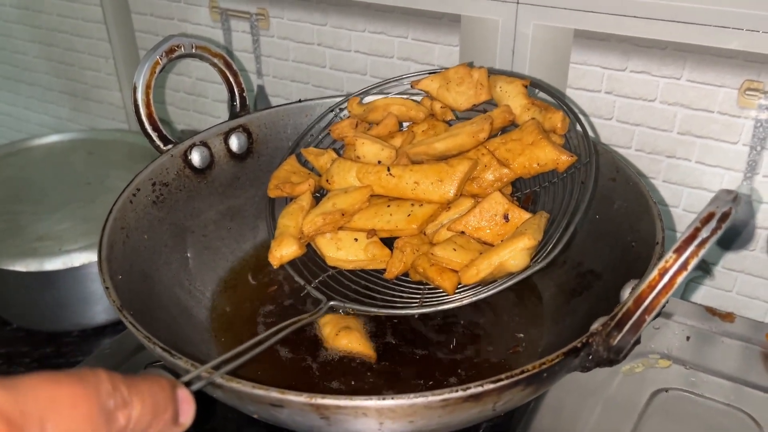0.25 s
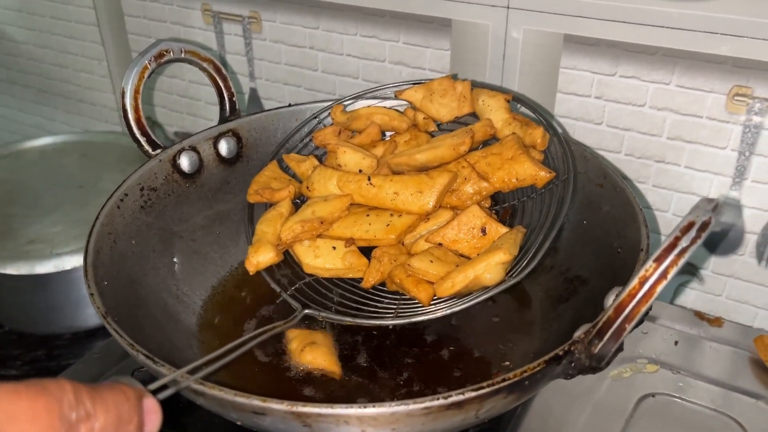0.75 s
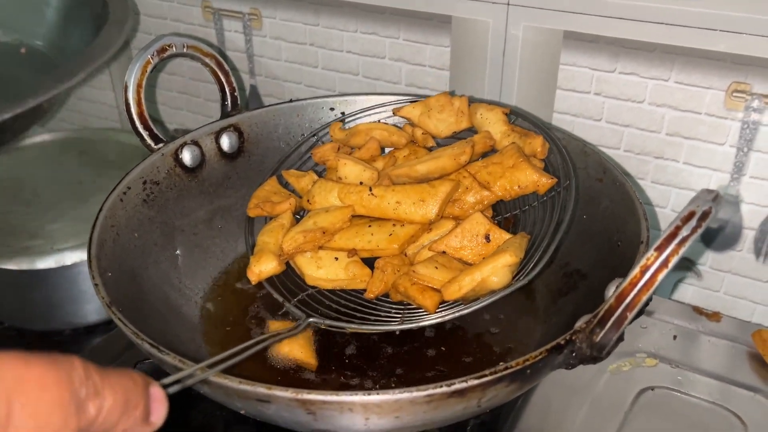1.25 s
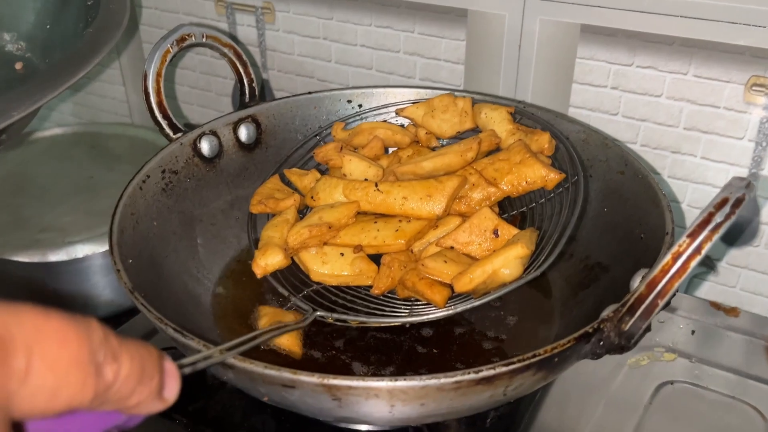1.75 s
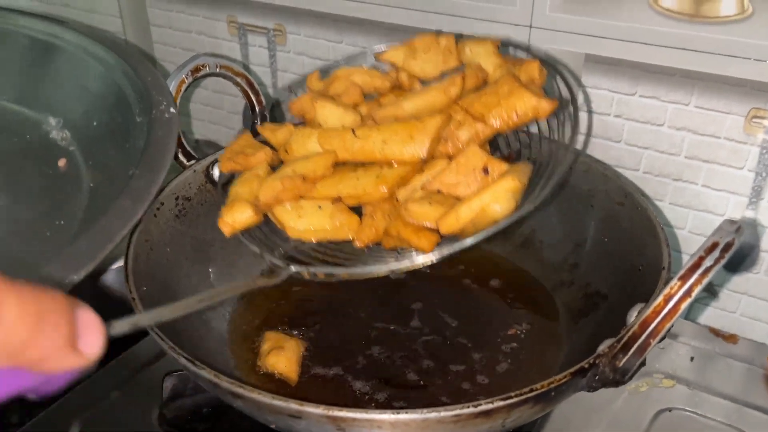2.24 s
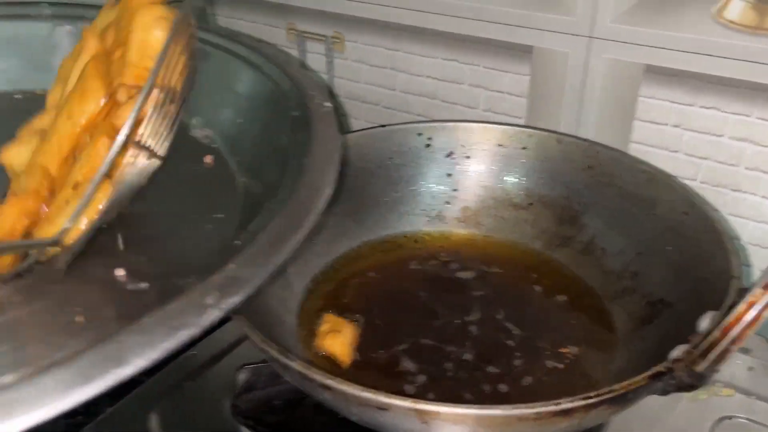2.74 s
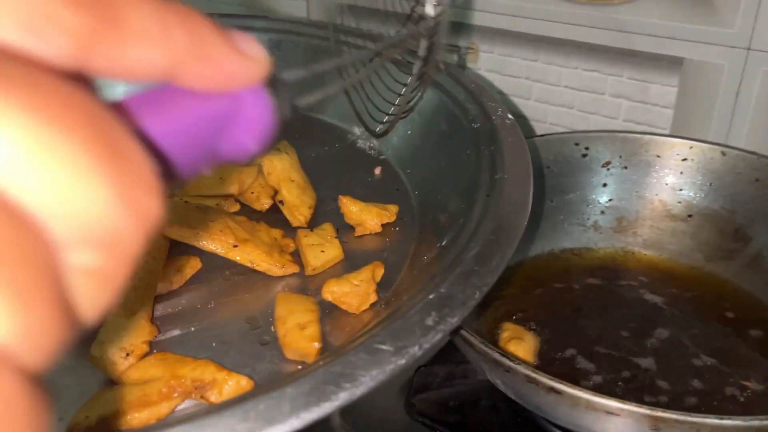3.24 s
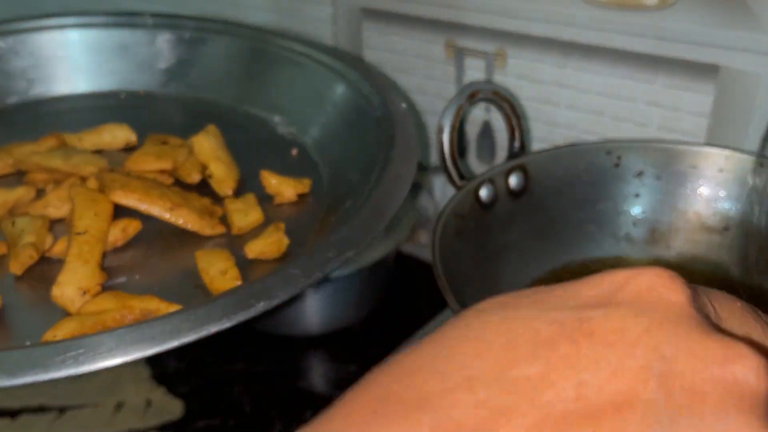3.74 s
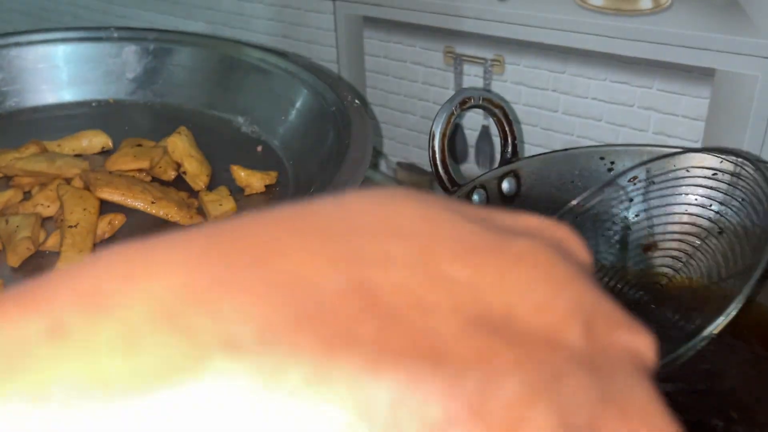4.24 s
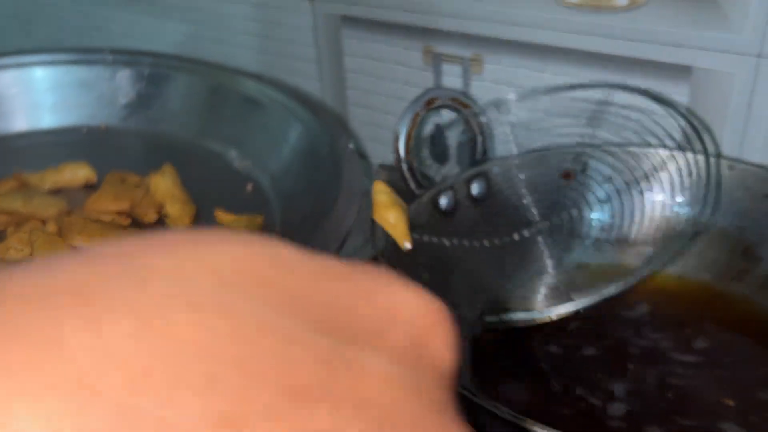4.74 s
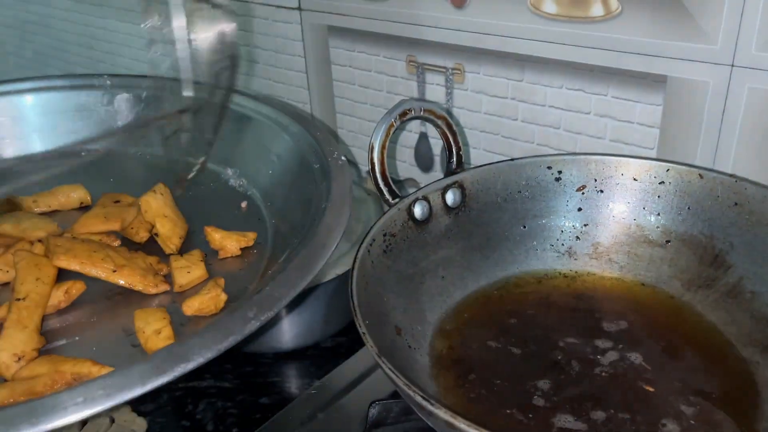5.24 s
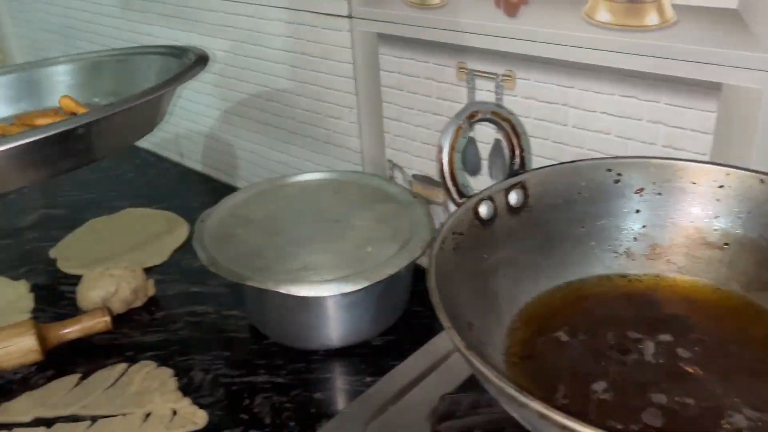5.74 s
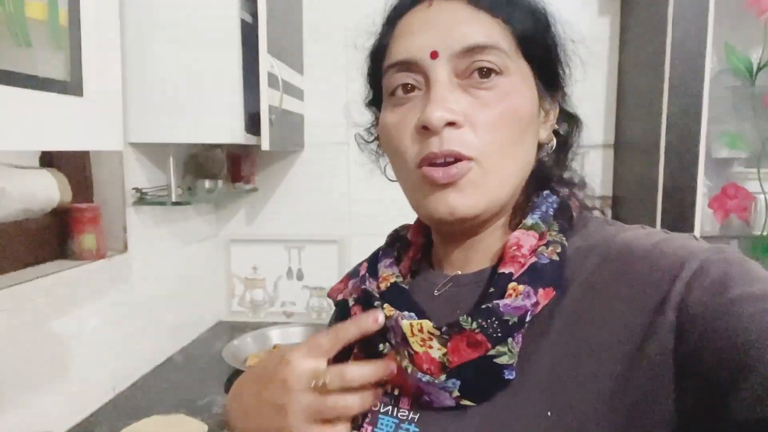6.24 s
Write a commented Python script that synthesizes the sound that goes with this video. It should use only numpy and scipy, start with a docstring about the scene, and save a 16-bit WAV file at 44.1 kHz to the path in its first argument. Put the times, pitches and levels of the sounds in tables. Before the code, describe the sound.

A metal skimmer clangs on a pan, then tips fried snacks clattering onto a steel plate while a gas flame softly hisses and pops.

```python
"""Frying in a home kitchen, heard on a phone. A gas flame pops softly over hiss and rumble; oil spits.
A wire skimmer knocks the iron pan, then a steel plate, and trembles. Near 3 s fried snacks tumble out,
thudding and ringing the plate's modes. A thin whistle glides far off while the wires scrape the pan;
lighter knocks, clinks and sliding snacks follow. Just after 6 s comes a short silent cut, and then
the phone stands elsewhere in the quiet room."""
import sys
import numpy as np
from scipy import signal
from scipy.fft import rfft, irfft, next_fast_len
from scipy.io import wavfile
from scipy.ndimage import uniform_filter1d, map_coordinates

SR = 44100
rng = np.random.default_rng(int(sys.argv[2]) if len(sys.argv) > 2 else 0)


def persist_wave(psi):
    """Save psi, clipped to +-1, as 16-bit WAV."""
    counts = np.round(np.clip(psi, -1, 1) * 32767).astype(np.int16)
    wavfile.write(sys.argv[1], SR, np.atleast_2d(counts).T)


N = 286014
TIME = np.arange(N) / SR


def amp(db):
    return 10 ** (np.asarray(db) / 20)


def unit(x):
    return x / np.sqrt(np.mean(x ** 2) + 1e-20)


def along(points, hz):
    """A table's columns after the first, read on a log frequency axis."""
    freqs, *columns = np.transpose(points)
    return np.squeeze([np.interp(np.log(hz + 1), np.log(freqs + 1), c) for c in columns])


def automation(rows):
    """One curve for each column after the time."""
    times, *columns = np.transpose(rows)
    return [np.interp(TIME, times, c) for c in columns]


def wobble(rate):
    """A smooth random curve, rate knots a second."""
    return map_coordinates(rng.standard_normal(int(N * rate / SR) + 4), [TIME * rate])


def swell(start, rise, db, fall_db_per_s):
    """Envelope of a movement: linear attack, exponential decay."""
    t = TIME - start
    return np.clip(t / rise, 0, 1) * amp(db - fall_db_per_s * np.maximum(t - rise, 0))


def filtered(x, response):
    """x through a complex frequency response."""
    size = next_fast_len(N + SR // 2)
    return irfft(rfft(x, size) * response(np.fft.rfftfreq(size, 1 / SR)), size)[..., :N]


def eq(points):
    return lambda hz: amp(along(points, hz))


def body(modes, width_hz):
    """Response of a struck object: resonances of alternating polarity."""
    def response(hz):
        f = hz[::16]
        damping = 1j * f * width_hz
        peaks = [(-1) ** k * amp(db) * damping / (centre ** 2 - f ** 2 + damping)
                 for k, (centre, db) in enumerate(modes)]
        return np.interp(hz, f, sum(peaks))
    return response


def noise(response, patchy_db):
    """Two unrelated noises with shared patches of random gain."""
    spectra = signal.stft(rng.standard_normal((2, N)), nperseg=512)[2]
    patches = uniform_filter1d(rng.standard_normal(spectra.shape[1:]), 6, axis=0)
    patches = unit(uniform_filter1d(patches, 12, axis=1))
    pair = signal.istft(spectra * amp(patchy_db * patches), nperseg=512)[1][:, :N]
    return unit(filtered(pair, response))


def contacts(rate, spread_db):
    """Two unrelated trains of tiny blows, rate a second."""
    hits = rng.random((2, N)) < rate / SR
    return unit(hits * rng.standard_normal((2, N)) * amp(spread_db * rng.standard_normal(N)))


def add(track, start, sound):
    """Mix a sound into a track at start seconds."""
    part = track[..., round(start * SR):][..., :sound.shape[-1]]
    part += sound[..., :part.shape[-1]]


# Stereo image at the stove and away from it: (frequency [Hz], likeness [0-1], left lead [rad])
STOVE_IMAGE = [(100, 1, 0), (300, 0.82, 0.5), (686, 0.39, 0.6), (1540, 0.17, 0.56), (3040, 0.66, -1.5),
               (5700, 0, 0.9), (7875, 1, 3.5), (8710, 1, 3), (10430, 0.4, 5.5), (11300, .99, 7),
               (13300, 0.8, 6.5), (14800, 0.99, 9.5)]
AWAY_IMAGE = [(104, 0.82, 1), (1020, 0.47, -2), (6900, 0.2, -1.5), (12950, 0.56, 9)]
# Balance at both spots: (frequency [Hz], left over right [dB])
STOVE_BALANCE = [(100, .5), (300, 0), (5000, 3), (7500, 0.5)]
AWAY_BALANCE = [(3000, -0.8)]
def phone_mics(pair, image, balance):
    """Mid/side to left/right: mid reaches both ports alike, with a lag; side differs. Sub-bass is lost."""
    def mix(hz):
        likeness, lead = along(image, hz)
        width = np.arccos(np.clip(likeness, 0, 1)) / 2
        mid, side = np.cos(width), np.sin(width)
        leftward = amp(along(balance, hz) / 2) * np.exp(.5j * lead)
        low_cut = (1j * hz / (1j * hz + 30)) ** 2
        return low_cut * np.array([[mid, side] * leftward, [mid, -side] / leftward])
    return filtered(pair, mix).sum(axis=1)


# Reverb decay: (frequency [Hz], T60 [s])
KITCHEN_DECAY = [(200, 0.71), (2000, 0.55), (12000, 0.28)]
def kitchen_reverb(x):
    """The room answers with a diffuse tail whose highs die first."""
    hz, t, spectra = signal.stft(rng.standard_normal((2, SR // 2)), SR, nperseg=256)
    decay = amp(-60 * t / along(KITCHEN_DECAY, hz)[:, None])
    tail = signal.istft(spectra * decay, SR, nperseg=256)[1]
    predelayed = np.pad(x, ((0, 0), (300, 0)))
    return signal.fftconvolve(predelayed, tail / np.linalg.norm(tail[0]), axes=1)[:, :N]


# Room tone spectrum: (frequency [Hz], level [dB])
ROOM_EQ = [(80, -2), (300, -5), (450, 10), (600, -1.5), (6000, -8.5), (11000, -14), (15500, -26)]
def room_tone():
    """A faint, steady bed of noise away from the stove."""
    return amp(-49.5) * noise(eq(ROOM_EQ), patchy_db=-0.1)


# Burner fader moves: (time [s], rumble level [dB], hiss level [dB])
BURNER_LEVELS = [(0, -49, -44.5), (.15, -53, -50), (3.5, -49.5, -51.5), (6.07, -52.5, -56)]
# Flame rumble and gas hiss spectra: (frequency [Hz], level [dB])
RUMBLE_EQ = [(25, -15), (70, 3.5), (140, 2.5), (200, -13), (275, -5), (400, -30.5), (800, -87)]
HISS_EQ = [(150, -21.5), (300, 2.5), (750, 6.5), (1500, 0.5), (3000, 1), (6000, -1.5), (11000, -1.5),
           (14500, -5), (15600, -24.5)]
def burner():
    """Burning gas rumbles unevenly and hisses, with a low, wavering hum."""
    rumble_db, hiss_db = automation(BURNER_LEVELS)
    rumble = amp(rumble_db + 3.7 * wobble(8.2)) * noise(eq(RUMBLE_EQ), patchy_db=0)
    hum = amp(-54 + 1.9 * wobble(15)) * np.sin(2 * np.pi * 149 * TIME)
    hiss = amp(hiss_db) * noise(eq(HISS_EQ), patchy_db=1.1)
    return rumble + hiss + hum * [[1], [0]]  # hum in the mid only


# Flame pop cues: (time [s], level [dB])
FLAME_POPS = [(0.054, -31.5), (.224, -30), (.424, -30.5), (0.46, -32), (0.682, -32), (0.747, -32.5),
              (.927, -29.5), (1.097, -30.5), (1.177, -30), (1.444, -28), (1.601, -30), (1.754, -30),
              (1.835, -29.5), (2.066, -29), (2.291, -30.5), (2.381, -28.5), (2.524, -29), (2.692, -32),
              (3.21, -28), (3.43, -31.5), (3.532, -31.5), (3.658, -32.5), (3.835, -33.5), (3.889, -31),
              (4.116, -31), (4.34, -31.5), (4.419, -32), (4.567, -33.5), (4.739, -31), (4.795, -32),
              (5.016, -34.5), (5.052, -31), (5.252, -28.5), (5.351, -31.5), (5.481, -31), (5.674, -33.5),
              (5.7, -31.5), (5.899, -28)]
def flame_pops():
    """Each pop is one pressure swing whose pitch drops; a hollow nearby answers."""
    sound, t = np.zeros(N), np.arange(SR // 20) / SR
    hollow = amp(-9.5 - 60 * t / 0.053) * np.sin(2 * np.pi * 275 * t)
    for start, db in FLAME_POPS:
        age = t / amp(0.55 * rng.standard_normal())  # each pop is stretched a little differently
        cycles = (age / .0048) ** .55 - .2
        envelope = (age / .0062 * np.exp(1 - age / .0062)) ** 1.4
        add(sound, start, amp(db) * (hollow - np.sin(2 * np.pi * cycles) * envelope))
    return sound * [[1], [0]]


# Whistle glide: (time [s], pitch [Hz], level [dB])
WHISTLE_GLIDE = [(3.5, 2554, -65), (3.95, 2190, -64.5), (4.2, 2080, -60), (4.55, 2036, -66.5),
                 (4.95, 2036, -58.5), (5.7, 2130, -69)]
def whistle(fade_s=0.079):
    """A thin, slightly unsteady tone that sinks and climbs again."""
    hz, db = automation(WHISTLE_GLIDE)
    phase = 2 * np.pi * np.cumsum(hz) / SR + 0.46 * wobble(30)
    fade_in = np.clip((TIME - WHISTLE_GLIDE[0][0]) / fade_s, 0, 1)
    fade_out = np.clip((WHISTLE_GLIDE[-1][0] - TIME) / fade_s, 0, 1)
    return fade_in * fade_out * amp(db) * np.array([np.sin(phase), np.cos(phase)])


# Hot oil cues: (time [s], level [dB], pitch [Hz])
OIL_SPITS = [(1.017, -36, 4260), (3.296, -27.5, 4074), (4.065, -37, 1580), (4.854, -33, 6460),
             (4.958, -33.5, 5930)]
def oil_spits():
    """Droplets burst with a click and a ping of a few cycles."""
    sound, t = np.zeros((2, N)), np.arange(SR // 50) / SR
    for start, db, hz in OIL_SPITS:
        ping = np.sin(2 * np.pi * hz * t) * amp(-60 * t * hz / 18)
        click = 0.93 * rng.standard_normal((2, len(t))) * amp(-60 * t / 0.0072)
        add(sound, start, amp(db) * (ping + click))
    return sound


# Small metal clinks: (time [s], level [dB], pitch [Hz])
METAL_CLINKS = [(5.72, -27.5, 4130), (5.89, -37, 3770), (5.947, -37.5, 4750)]
def clinks():
    """Metal rings briefly in two inharmonic partials."""
    sound, t = np.zeros((2, N)), np.arange(SR // 10) / SR
    for start, db, hz in METAL_CLINKS:
        ring = np.sin(2 * np.pi * hz * t) + .9 * np.sin(2 * np.pi * 1.32 * hz * t)
        add(sound, start, amp(db - 60 * t / 0.028) * ring * [[1], [.3]])
    return sound


# Skimmer wire modes and the spectrum of dry, crisp contact: (frequency [Hz], level [dB])
WIRE_MODES = [(750, -2), (1155, 4.5), (1250, 1), (1440, 1.5), (1780, -1.5), (2190, -4.5), (2600, -6),
              (3330, -2), (4220, -7.5), (5950, -1)]
CRISP_EQ = [(400, -5.5), (1500, 2.5), (3500, 7), (7000, -5), (10000, -17), (16000, -50)]
def skimmer_scrape(start_s=4.432, lift_off_s=4.67):
    """Fast slips of the wires on the pan ring the skimmer until it lifts off."""
    slips = contacts(rate=4700, spread_db=4)
    wires = body(WIRE_MODES, width_hz=70)
    rasp = unit(filtered(slips, lambda hz: wires(hz) + amp(along(CRISP_EQ, hz) - 16.5)))
    touching = np.clip((lift_off_s - TIME) / 0.018 + 1, 0, 1)
    return touching * swell(start_s, rise=0.061, db=-38, fall_db_per_s=100) * rasp


# Trembles of the lifted skimmer: (time [s], attack [s], level [dB], decay [dB/s])
TREMBLES = [(2.167, 0.0067, -41, 57), (2.329, 0.041, -46.5, 56.5)]
# The steel plate's low and bright modes, and an impact's crack: (frequency [Hz], level [dB])
PLATE_LOW_MODES = [(222, -2.5), (252, -3.5), (278, -3.5), (382, -8.5), (445, -10), (577, -3.5), (706, -5),
                   (752, -6), (807, -3), (835, -3.5), (1105, -9), (1369, -9), (1600, -17.5), (2000, -19.5),
                   (2210, -19.5)]
PLATE_BRIGHT_MODES = [(1785, -3), (3100, -6), (3610, 1), (3705, 4), (3850, -7.5)]
CRACK_EQ = [(150, 0.5), (1000, -3), (2700, -10), (4300, -2.5), (6200, -7.5), (11000, -12), (13000, -16),
            (16000, -27.5)]
def skimmer_tremble():
    """Loose wires and the plate keep buzzing after the skimmer leaves the rim."""
    def response(hz):
        wires = amp(-5.5) * body(WIRE_MODES, width_hz=16)(hz)
        rim = body(PLATE_BRIGHT_MODES, width_hz=33)(hz)
        plate = amp(4) * body(PLATE_LOW_MODES, width_hz=20)(hz)
        return wires + rim + plate + amp(along(CRACK_EQ, hz) - 9)
    chatter = contacts(rate=250, spread_db=3) * amp(4 * wobble(24))
    return sum(swell(*move) for move in TREMBLES) * unit(filtered(chatter, response))


# Snacks sliding and tumbling on the plate:
# (time [s], attack [s], level [dB], decay [dB/s], ring over thud [dB], crispness over thud [dB])
SNACK_MOVES = [(2.666, 0.013, -40.5, 63, 1, -5), (2.799, 0.13, -16.5, 96.5, 0, -8.5),
               (5.787, 0.0114, -33, 114, -8, -8), (5.87, 0.025, -37, 71, -8, -11.5),
               (6.035, 0.014, -42, 36, -1.5, -6.5)]
# Thud of landing dough: (frequency [Hz], level [dB])
THUD_EQ = [(60, -25), (130, -10.5), (230, -5), (330, -3.5), (700, -2), (1000, -8), (2200, -17), (4000, -40)]
def snack_tumble():
    """Many soft, lumpy blows thud and drive the plate; dry edges add the treble."""
    blows = contacts(rate=1400, spread_db=2) * amp(3 * wobble(45))
    thud = unit(filtered(blows, eq(THUD_EQ)))
    ring = unit(filtered(blows, body(PLATE_LOW_MODES, width_hz=22.3)))
    edges = contacts(rate=2500, spread_db=3) * amp(3.5 * wobble(40))
    crisp = unit(filtered(edges, eq(CRISP_EQ)))
    return sum(swell(*move) * (thud + amp(ring_db) * ring + amp(crisp_db) * crisp)
               for *move, ring_db, crisp_db in SNACK_MOVES)


# The biggest snacks hitting the plate: (time [s], level [dB])
SNACK_HITS = [(2.852, -24), (2.88, -30), (2.926, -13), (2.955, -20), (2.98, -21.5), (3.019, -20),
              (3.075, -27)]
def snack_landings():
    """Each big snack briefly rings its own mix of the plate's modes."""
    sound, t = np.zeros((2, N)), np.arange(SR // 6) / SR
    hz, mode_db = np.transpose(PLATE_LOW_MODES)[:, :, None]
    tilt_db = 4 * np.log2(hz / 1000)
    envelope = (1 - np.exp(-t / 0.0035)) * amp(-60 * t / 0.14)
    for start, db in SNACK_HITS:
        gains = amp(mode_db + tilt_db + rng.normal(0, 3, (2, len(hz), 1)))
        ring = (gains * np.sin(2 * np.pi * hz * t)).sum(axis=1)
        add(sound, start, amp(db) * envelope * ring)
    return sound


# Skimmer hits on the pan and on the plate; the sends are relative to the hit's level:
# (time [s], level [dB], low send [dB], wire send [dB], bright send [dB], pan only: boom level [dB])
PAN_HITS = [(1.3445, -14.5, 4, -1, 4, -25.5), (1.808, -51.5, 11, 3.5, -14, -51),
            (5.717, -23.5, 1, -24, -6.5, -27.5), (5.792, -32, -1, 3.5, -3, -37)]
PLATE_HITS = [(2.161, -24, -1.5, -22, 3), (2.235, -41.5, 4.5, -24, -6.5), (2.756, -7, -12.5, -11.5, -1),
              (5.127, -41.5, 18.5, -34, 4), (5.209, -44.5, 12, -17, -1), (5.26, -36, 4.5, -25, -12),
              (5.295, -39.5, 8, -15, -14)]
def pan_boom(hz=281, beat_hz=5.5, attack_s=0.015, t60_s=0.48):
    """Each knock on the pan wakes its deepest mode, a close pair that swells in and beats."""
    sound, t = np.zeros((2, N)), np.arange(SR // 2) / SR
    envelope = (1 - np.exp(-t / attack_s)) * amp(-60 * t / t60_s)
    beating = 0.67 + np.cos(np.pi * beat_hz * t) ** 2
    ring = envelope * beating * np.sin(2 * np.pi * hz * t)
    for start, *_, boom_db in PAN_HITS:
        add(sound, start, amp(boom_db) * ring * [[1], [0]])
    return sound


# The iron pan's low and bright modes: (frequency [Hz], level [dB])
PAN_LOW_MODES = [(583, -4.5), (690, -6), (748, 3), (820, -1.5), (1045, -11), (1448, -13)]
PAN_BRIGHT_MODES = [(3500, -11.5), (3620, 3.5), (3850, 0), (4110, 1.5), (4420, -2.5), (4540, -2.5),
                    (4950, -9)]
def skimmer_knocks():
    """A blow and its short rattle crack, ring the struck vessel low and bright, and shake the wires."""
    buses, t = np.zeros((6, 2, N)), np.arange(SR // 8) / SR
    crack, wires, pan_bright, plate_bright, pan_low, plate_low = buses
    push = 2.6 * t / 0.00073 * np.exp(1 - t / 0.00038) * [[1], [.3]]  # the blow itself
    envelope = (1 - np.exp(-t / 0.0012)) * (amp(-60 * t / 0.026) + 0.48 * amp(-60 * t / 0.15))
    for hits, bright, low in [(PAN_HITS, pan_bright, pan_low), (PLATE_HITS, plate_bright, plate_low)]:
        for start, db, low_db, wire_db, bright_db, *_ in hits:
            rattle = rng.standard_normal((2, len(t))) * envelope
            add(crack, start, amp(db) * rattle)
            add(wires, start, amp(db + wire_db) * rattle)
            add(bright, start, amp(db + bright_db) * rattle)
            add(low, start, amp(db + low_db) * (rattle + push))

    def blunt_wires(hz):  # a blunt blow reaches only the low wire modes
        return body(WIRE_MODES, width_hz=55)(hz) / (1 + 1j * hz / 1000) ** 3
    return (amp(7.5) * filtered(crack, eq(CRACK_EQ))
            + amp(31.5) * filtered(wires, blunt_wires)
            + amp(14) * filtered(pan_bright, body(PAN_BRIGHT_MODES, width_hz=20))
            + amp(14) * filtered(plate_bright, body(PLATE_BRIGHT_MODES, width_hz=55))
            + amp(17.5) * filtered(pan_low, body(PAN_LOW_MODES, width_hz=9))
            + amp(17.5) * filtered(plate_low, body(PLATE_LOW_MODES, width_hz=36)))


def scene(cut_s=6.071, resume_s=6.118):
    """Cooking at the stove, mixed in mid/side; a hard cut, then room tone."""
    foley = skimmer_knocks() + skimmer_tremble() + snack_tumble() + skimmer_scrape()
    foley += oil_spits() + clinks() + snack_landings()
    mix = foley * [[1], [.6]] + amp(-5.5) * kitchen_reverb(foley)  # the direct sound is narrower
    mix += pan_boom() + flame_pops() + burner() + whistle()
    stove = phone_mics(mix, STOVE_IMAGE, STOVE_BALANCE)
    away = phone_mics(room_tone(), AWAY_IMAGE, AWAY_BALANCE)
    cut = np.clip((cut_s - TIME) / 0.00081, 0, 1)
    fade_in = np.clip((TIME - resume_s) / 0.043, 0, 1)
    return stove * cut + away * fade_in


def record(dry, ceiling=0.8, top_hz=16600):
    """The phone soft-clips loud peaks and drops all above its band limit."""
    soft = dry / (1 + np.abs(dry / ceiling) ** 4) ** .25
    return filtered(soft, lambda hz: hz < top_hz)


dry = scene()
out = record(dry)
persist_wave(out)
```